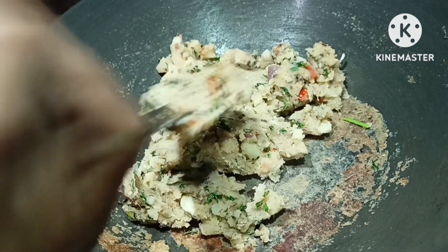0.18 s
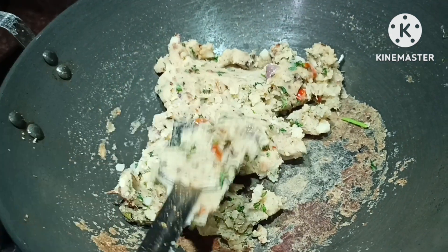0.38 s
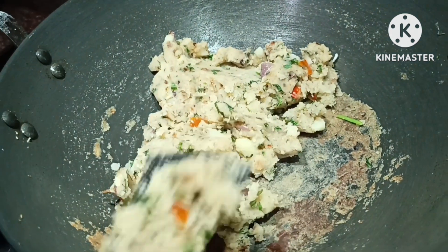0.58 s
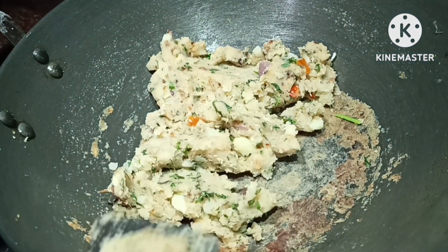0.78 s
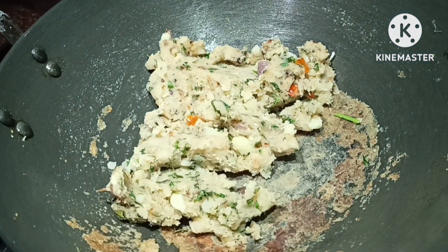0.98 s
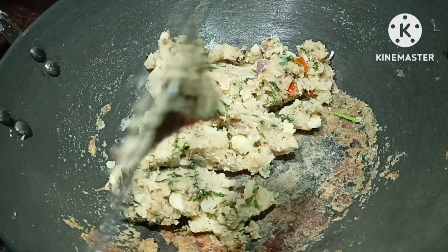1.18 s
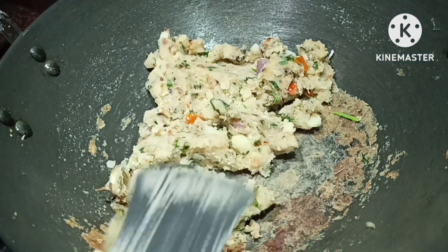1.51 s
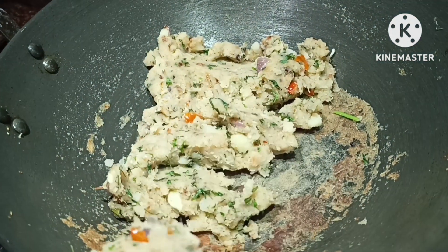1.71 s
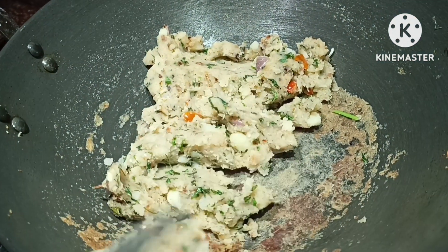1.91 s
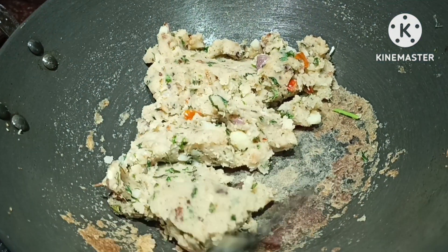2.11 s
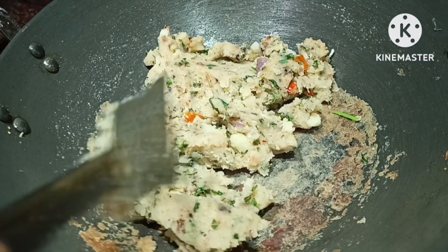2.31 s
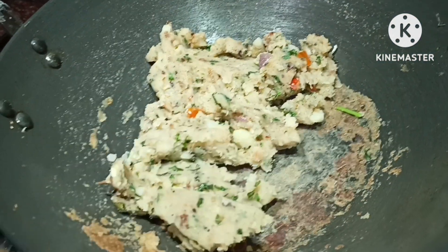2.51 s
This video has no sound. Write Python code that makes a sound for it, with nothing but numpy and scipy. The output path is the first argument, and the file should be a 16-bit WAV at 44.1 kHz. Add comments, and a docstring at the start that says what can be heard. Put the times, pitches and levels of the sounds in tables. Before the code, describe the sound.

Metal spatula tapping and scraping soft mash in a pan, then two knocks, with a low hum.

```python
"""A small, hard-walled kitchen, one microphone close to a metal pan of soft mashed food.
A metal spatula pats and scrapes the mash, clips the pan in passing, then knocks on it twice.
Sticky food crackles on the blade; behind it an appliance hums throughout.
The microphone's limiter ducks the hum around the hardest knock."""
import sys
import numpy as np
from scipy import signal
from scipy.fft import rfft, irfft
from scipy.io import wavfile
from scipy.ndimage import uniform_filter1d, minimum_filter1d

SR = 44100
rng = np.random.default_rng(int(sys.argv[2]) if len(sys.argv) > 2 else 0)


def transcribe(signal):
    """Save signal, clipped to [-1, 1], as a 16-bit WAV file at the path in sys.argv[1]."""
    frames = np.atleast_2d(signal).T
    limited = np.clip(frames, -1, 1)
    pcm = np.round(limited * 32767).astype(np.int16)
    wavfile.write(sys.argv[1], SR, pcm)


N = 116865

# The hum's slow rise and fall: time_s, level_db
HUM_LEVEL = [(0, -36), (.3, -33.5), (.7, -33.5), (.87, -29.5), (1.05, -32), (1.2, -31.5), (1.42, -33),
             (1.65, -36), (1.87, -32), (2.15, -34), (2.6, -34)]
# Resonances in the appliance's rush: pitch_hz, width_hz, level_db
DRONES = [(63.4, 4.3, -52.5), (101, 11, -49.5), (181.4, 16, -45.5), (308.4, 3.3, -52.5), (1081.6, 13, -51)]
# Spectrum of the rushing air, low end and upper range: frequency_hz, level_db
AIR_BASS = [(20, -32), (45, -23), (70, 10), (150, 3.5)]
AIR_UPPER = [(250, -5), (400, -0.5), (500, 0.5), (690, -13.5), (960, -11.5), (1300, -13.5), (2160, -13.5),
             (3300, -18.5), (4500, -20), (5300, -16.5), (6400, -15.5), (7500, -10), (9000, -17.5),
             (11200, -21.5), (14000, -14.5), (15500, -18.5)]
# Ticks of blade and sticky food: start_s, level_db, t60_s, centre_hz, blade_ring_db
TICKS = [(0.1176, -36, 0.025, 7050, -40.5), (0.1541, -21.5, .03, 8500, -29),
         (0.1651, -22, 0.066, 8340, -54), (0.2206, -32, .06, 7900, -50), (.229, -33, .05, 7000, -45),
         (0.239, -36.5, .04, 7050, -43), (0.2945, -29.5, 0.12, 7900, -42.5), (0.306, -29, 0.042, 8000, -38),
         (0.3225, -29.5, 0.064, 6360, -36), (0.34, -27, 0.037, 8550, -46), (0.4423, -26, 0.046, 10100, -51),
         (0.4591, -27, 0.042, 9500, -46), (0.5364, -31.5, 0.064, 5140, -58), (.5721, -23, 0.078, 9700, -35),
         (.631, -30.5, 0.034, 7000, -39.5), (1.3847, -23.5, 0.094, 8600, -30),
         (1.4421, -20, .012, 6470, -46), (2.0045, -27, 0.018, 8400, -33), (2.019, -32.5, 0.17, 6000, -58)]
# Spectrum of a tick: frequency_hz, level_db
TICK_SPECTRUM = [(60, -50), (300, -25), (1500, 23), (2700, 5.5), (3500, -9.5), (5000, 1), (6500, 0.5),
                 (7700, -1), (8600, 2.5), (10500, -7), (13000, 3), (15500, 5)]
# Thin modes of the blade's edge: pitch_hz, level_db, t60_s
BLADE_MODES = [(2720, -11.5, 0.074), (3740, -14, 0.12), (6190, 5, 0.042), (6810, 8.5, 0.047),
               (7380, 3, 0.036), (9220, 1, 0.093), (13100, -15, 0.055)]
# Blade pats the mash: start_s, level_db, t60_s, tilt_db_per_octave, hollow_note_db
PATS = [(0.137, -25.5, 0.022, 1.5, -61), (0.539, -21.5, 0.072, -3, -14.5), (.552, -23.5, .05, 0.5, -21.5),
        (0.566, -28, 0.1, 3, -52), (.592, -22, 0.081, 0.5, -28), (0.839, -33.5, 0.12, -3.5, -55),
        (1.042, -14.5, 0.052, -0.5, -37), (1.474, -24, 0.11, -1, -45), (1.503, -19, 0.09, 1.5, -47),
        (1.929, -22, 0.13, -0.5, -58)]
# Spectrum of a pat: frequency_hz, level_db
PAT_SPECTRUM = [(60, -16), (170, -4.5), (300, 2), (480, 1.5), (630, -11.5), (850, -1), (1300, -6.5),
                (1800, -17.5), (2800, -11), (4000, -33), (15000, -57)]
# Pressure swells as the blade slides on the pan: peak_s, level_db, rise_s, fall_s
SCRAPES = [(.60, -38, 0.022, 0.14), (0.763, -34.5, 0.01, 0.025), (1.02, -43, 0.078, 0.027),
           (1.056, -26.5, 0.0078, .03), (1.084, -20, 0.015, 0.02), (1.115, -32.5, .01, 0.035),
           (1.498, -30, 0.011, 0.14), (1.675, -31.5, 0.083, 0.037), (1.851, -35.5, 0.012, 0.046),
           (1.925, -34, 0.033, 0.026), (1.965, -27.5, .012, .014)]
# Spectrum of the scraping hiss: frequency_hz, level_db
SCRAPE_SPECTRUM = [(40, -55), (200, -13), (900, -8), (1600, -15), (2200, -8), (2850, -8), (3800, -9),
                   (4600, 1), (5400, 6.5), (6300, -1.5), (7700, 4), (8600, -1), (10500, -10), (15000, -5.5)]
# Modes of the pan: pitch_hz, level_db, undamped_t60_s
PAN_MODES = [(861, -3, 0.25), (924, -5.5, 0.26), (1117, -11.5, 0.33), (1400, -14, 0.2), (1600, -11, 0.28),
             (2145, 1, 0.25), (2173, -1.5, 0.21), (2845, -5, 0.3), (3560, -5, 0.41), (4410, -11, .33),
             (4830, -8, .17), (5220, 3, 0.13), (5420, 0, 0.13), (5500, -33, 0.16), (6300, -26, .25),
             (7016, 9.5, 0.083), (7770, 3.5, 0.26), (7700, 6, 0.079), (11930, -1, 0.067),
             (14453, -17, 0.21)]
# Blade strikes the pan:
# start_s, clash_db, clash_t60_s, relative_ring_db, ring_t60_factor, ting_db, tilt_db_per_octave
KNOCKS = [(1.4641, -8.5, 0.066, -14.5, 0.38, -42, 2), (1.4763, -8.5, 0.077, -14.5, 0.56, -26, 0.5),
          (1.6776, -19, 0.057, -25.5, 0.54, -34, -1.5), (2.2173, 0, 0.084, -5, 0.35, -10.5, -0.5),
          (2.3172, -8.5, 0.094, -16, 0.78, -18, -0.5)]
# Spectrum of the clash's dense, short-lived modes: frequency_hz, level_db
CLASH_SPECTRUM = [(30, -55), (130, -9), (400, -3), (900, 5), (1500, -3.5), (2300, 5), (3300, -4),
                  (4800, 13), (7700, 8), (10000, 0), (15000, 0.5)]
# First reflections off pan wall, worktop and tiles: delay_s, level_db
ECHOES = [(.0021, -18), (.0052, -11.5), (.0083, -9.5), (0.0117, -13.5), (.0165, -14)]
# The room's decay time: frequency_hz, t60_s
ROOM_T60 = [(150, 0.68), (1000, 0.23), (4000, 0.22), (8000, 0.21), (15000, 0.19)]


def amp(db):
    return 10 ** (np.asarray(db) / 20)


def unit_rms(x):
    return x / np.sqrt(np.mean(x ** 2) + 1e-20)


def curve_at(points, hz):
    point_hz, value = np.transpose(points)
    return np.interp(np.log(hz + 1), np.log(point_hz + 1), value)


def add(mix, start_s, sound):
    part = mix[round(start_s * SR):][:len(sound)]
    part += sound[:len(part)]


def decay(t, t60):
    return np.exp(-np.log(1000) * t / max(t60, 1e-3))


def colour(x, spectrum, tilt=0, centre_hz=1000, focus_db=0):
    """Gives x a spectrum, tilted or focused to fall focus_db an octave off centre; rms 1."""
    hz = np.fft.rfftfreq(len(x), 1 / SR)
    octaves = np.log2((hz + 20) / centre_hz)
    gain_db = curve_at(spectrum, hz) + tilt * octaves - focus_db * octaves ** 2
    return unit_rms(irfft(rfft(x) * amp(gain_db), len(x)))


def narrow_noise(centre_hz, width_hz):
    """Noise in one steep resonance, a random waver when centred on zero; rms 1."""
    hz = np.fft.rfftfreq(N, 1 / SR)
    return unit_rms(irfft(rfft(rng.standard_normal(N)) / (1 + ((hz - centre_hz) / width_hz) ** 2), N))


def contact_point(x, spread_db, spacing_hz=169.9):
    """Each point of contact favours its own resonances: random narrow peaks and dips; rms 1."""
    hz = np.fft.rfftfreq(len(x), 1 / SR)
    knots = np.clip(rng.standard_normal(400), -2, 1)
    gain_db = spread_db * np.interp(hz / spacing_hz, np.arange(len(knots)), knots)
    return unit_rms(irfft(rfft(x) * amp(gain_db), len(x)))


def ring(t, modes, t60_factor=1):
    """The modes of a metal part dying away after one impulse."""
    return sum(amp(db) * decay(t, t60 * t60_factor) * np.sin(2 * np.pi * (hz * t + rng.random()))
               for hz, db, t60 in modes)


def appliance(hum_hz=100.3, air_db=-39.5):
    """The background: a wavering hum and a steady rush of air with droning resonances."""
    t = np.arange(N) / SR
    hum_db = np.interp(t, *np.transpose(HUM_LEVEL))
    hum = np.sqrt(2) * amp(hum_db) * np.sin(2 * np.pi * hum_hz * t)
    drones = sum(amp(db) * narrow_noise(hz, width) for hz, width, db in DRONES)
    air = amp(air_db) * colour(rng.standard_normal(N), AIR_BASS + AIR_UPPER)
    waver = 1 + 0.046 * narrow_noise(0, width_hz=1.1)
    return hum * waver + drones + air


def ticks():
    """Small bright contacts of blade and sticky food ring the edge and hardly move the pan."""
    out, t = np.zeros(N), np.arange(SR // 5) / SR
    for start_s, db, t60, hz, ring_db in TICKS:
        grit = colour(rng.standard_normal(len(t)), TICK_SPECTRUM, centre_hz=hz, focus_db=9)
        grit = contact_point(grit, spread_db=6)
        add(out, start_s, amp(db) * decay(t, t60) * grit + amp(ring_db) * ring(t, BLADE_MODES))
    return out


def pats(rise_s=0.0026, hollow_hz=1294):
    """Dull blows on the pan, cushioned by the food, some with a hollow note."""
    out, t = np.zeros(N), np.arange(SR // 4) / SR
    for start_s, db, t60, tilt, hollow_db in PATS:
        noise = colour(rng.standard_normal(len(t)), PAT_SPECTRUM, tilt)
        thud = amp(db) * decay(t, t60) * contact_point(noise, spread_db=2.5)
        hollow = amp(hollow_db) * decay(t, t60=0.026) * np.sin(2 * np.pi * hollow_hz * t)
        add(out, start_s, np.minimum(t / rise_s, 1) * (thud + hollow))
    return out


def scrapes(slips_per_s=6900, slip_spread_db=2.5, clump_db=3.72, ring_db=-11):
    """Tiny slips of the blade come in clumps, hissing and ringing the pan as pressure swells."""
    t = np.arange(N) / SR
    swells = (amp(db) * np.exp(-np.maximum((peak_s - t) / rise_s, (t - peak_s) / fall_s))
              for peak_s, db, rise_s, fall_s in SCRAPES)
    pressure = np.sqrt(sum(swell ** 2 for swell in swells))
    pressure *= amp(clump_db * narrow_noise(0, width_hz=88.5))
    slips = (rng.random(N) < slips_per_s / SR) * rng.choice([-1, 1], N)
    slips = slips * amp(slip_spread_db * np.minimum(rng.exponential(1, N), 4))
    pan = ring(t[:SR // 2], PAN_MODES, t60_factor=0.15)
    ringing = signal.fftconvolve(unit_rms(slips) * pressure, pan / np.linalg.norm(pan))[:N]
    return colour(slips, SCRAPE_SPECTRUM) * pressure + amp(ring_db) * ringing


def knocks():
    """Metal on metal: a dense clash and the pan's modes, damped while the blade stays down."""
    out, t = np.zeros(N), np.arange(SR // 2) / SR
    for start_s, clash_db, t60, ring_db, t60_factor, _, tilt in KNOCKS:
        noise = colour(rng.standard_normal(len(t)), CLASH_SPECTRUM, tilt)
        clash = amp(clash_db) * decay(t, t60) * contact_point(noise, spread_db=5)
        ringing = amp(ring_db) * ring(t, PAN_MODES, t60_factor) / 2
        add(out, start_s, clash + ringing)
    return out


def ting(pitch_hz=2886, rise_s=0.0032, t60_s=0.29):
    """One clear note swells in as the blade bounces free, topped up by each knock."""
    level, t = np.zeros(N), np.arange(N) / SR
    for start_s, *_, ting_db, _ in KNOCKS:
        add(level, start_s, amp(ting_db) * (1 - np.exp(-t / rise_s)) * decay(t, t60_s))
    return level * np.sin(2 * np.pi * pitch_hz * t)


def with_echoes(x):
    """The direct sound and its first reflections off nearby surfaces, at about the same power."""
    out = x.copy()
    for delay_s, db in ECHOES:
        add(out, delay_s, amp(db) * x)
    return out / np.sqrt(1 + sum(amp(db) ** 2 for _, db in ECHOES))


def room(x, delay_s=0.016):
    """The tail of a small hard room, each band dying at its own speed."""
    hz, t, bands = signal.stft(rng.standard_normal(SR // 2), SR, nperseg=256)
    fade = amp(-60 * t / curve_at(ROOM_T60, hz)[:, None])
    tail = signal.istft(bands * fade, SR, nperseg=256)[1]
    tail *= np.arange(len(tail)) > delay_s * SR
    return signal.fftconvolve(x, tail / np.linalg.norm(tail))[:N]


def scene(room_db=-11.5):
    """At the microphone, in mono: the pan up close, the room and the appliance behind it."""
    pan = with_echoes(knocks() + scrapes()) + ticks() + pats()
    return (pan + amp(room_db) * room(pan) + ting() + appliance())[None]


def record(dry, limit_db=-11, ahead_s=0.027, hold_s=0.043, recover_db_per_s=73, cutoff_hz=15700):
    """The limiter dips just before loud peaks, holds and recovers; a low-pass trims the top."""
    level_db = 10 * np.log10(abs(uniform_filter1d(dry[0] ** 2, size=200)) + 1e-12)
    ahead, hold = int(ahead_s * SR), int(hold_s * SR)
    over_db = np.pad(np.maximum(level_db - limit_db, 0), (hold, ahead))
    held_db = -minimum_filter1d(-over_db, ahead + hold + 1)[(ahead + hold) // 2:][:N]
    recovery_db = np.arange(N) * recover_db_per_s / SR
    cut_db = np.maximum.accumulate(held_db + recovery_db) - recovery_db
    gain = amp(-uniform_filter1d(cut_db, size=300))
    low_pass = signal.firwin(511, cutoff_hz, window=("kaiser", 7), fs=SR)
    return signal.oaconvolve(dry * gain, low_pass[None], "same")


dry = scene()
out = record(dry)
transcribe(out)
```